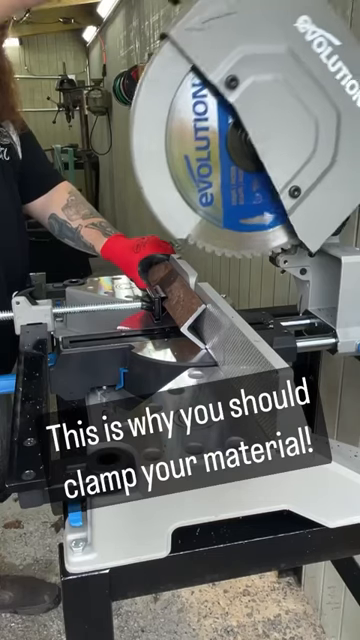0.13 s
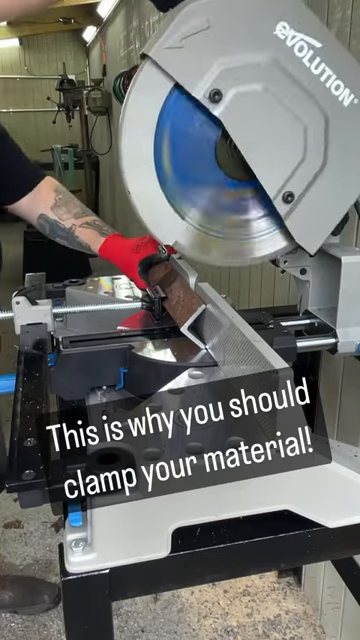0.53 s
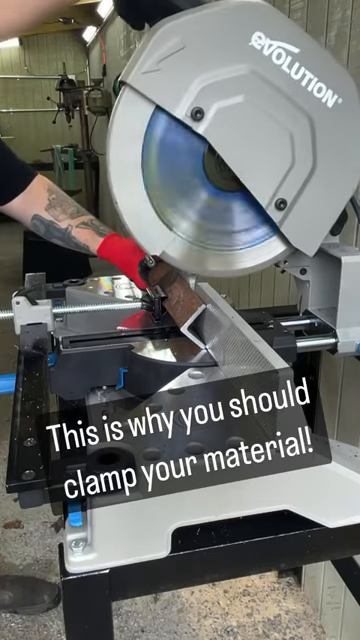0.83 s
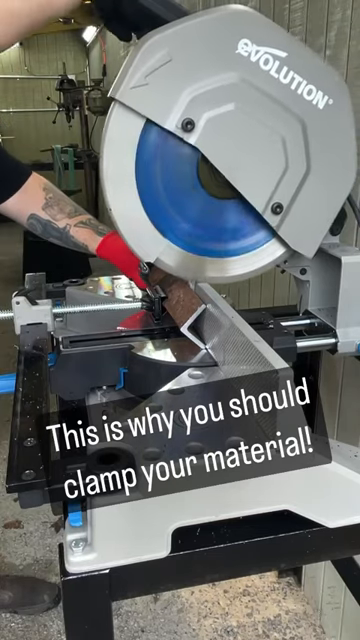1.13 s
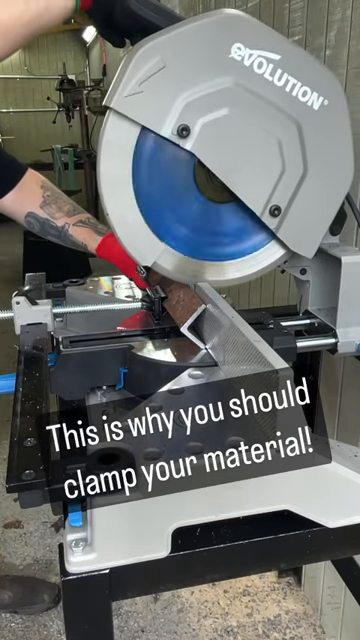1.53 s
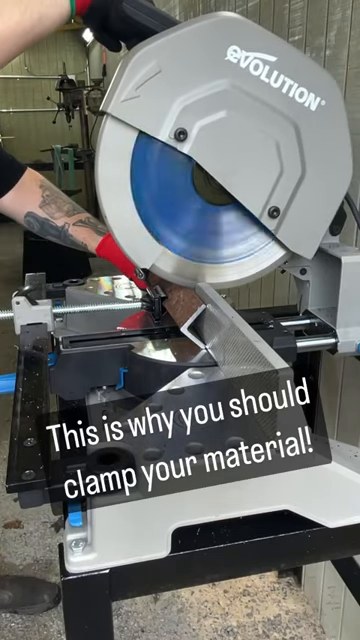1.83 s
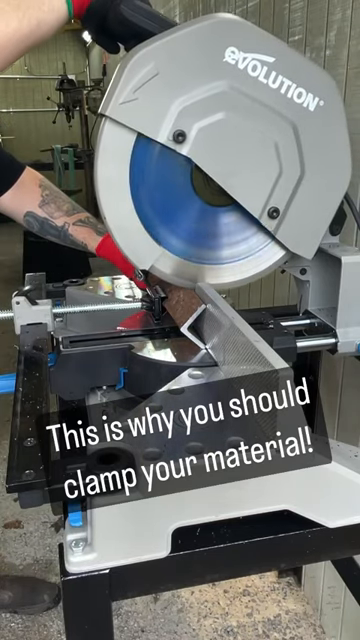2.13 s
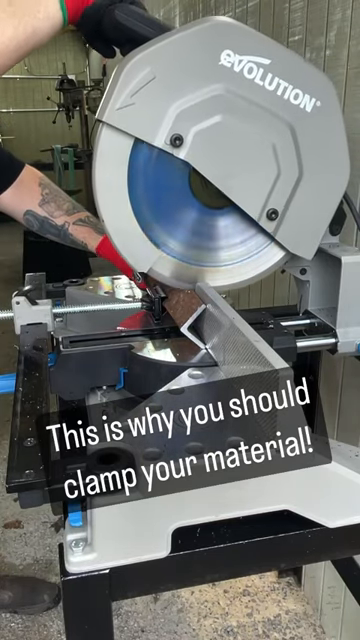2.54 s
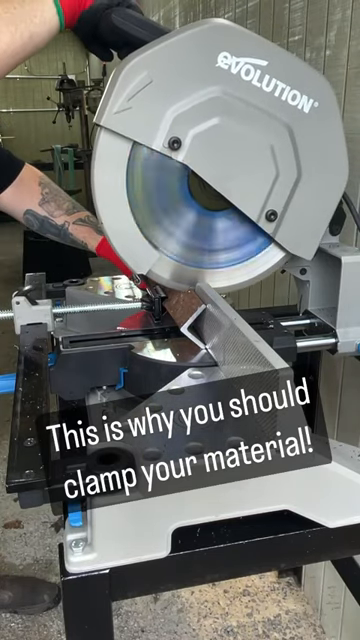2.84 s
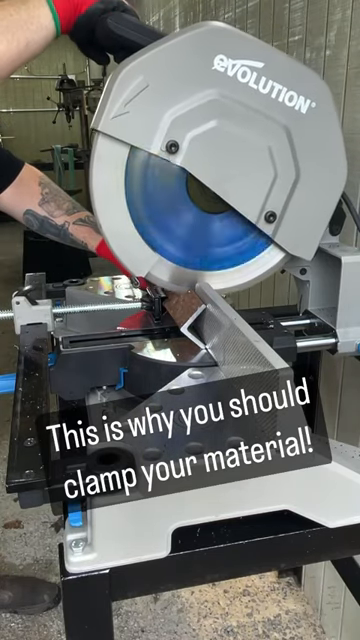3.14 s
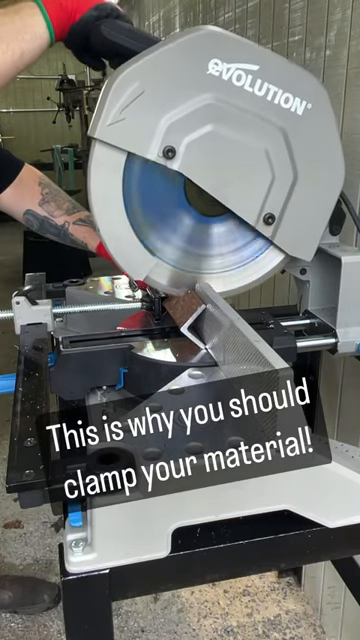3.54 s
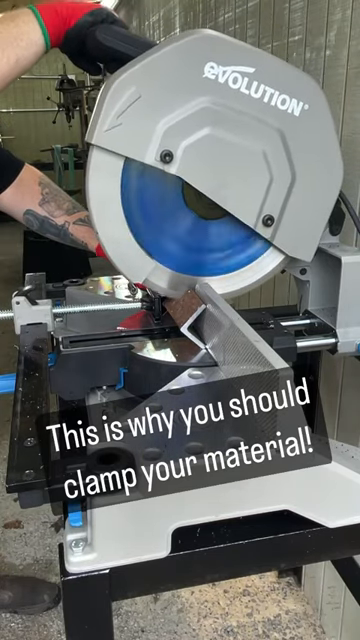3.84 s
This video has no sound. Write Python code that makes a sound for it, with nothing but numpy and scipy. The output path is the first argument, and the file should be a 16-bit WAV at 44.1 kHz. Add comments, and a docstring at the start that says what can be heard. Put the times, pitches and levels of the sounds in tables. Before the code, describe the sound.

A chop saw in a quiet workshop, close up in stereo: faint rustles, a trigger clack, motor hum and whine climbing to a roar, then the blade bites steel with shrieking, ringing grinding until the end.

```python
"""A chop saw grinds steel in a workshop, close to a phone with two microphone ports: tooth-rate tones shriek,
flickering noise grinds, and blade and workpiece ring as resonators driven by that grinding.
Under it the motor hums, whines in multiples of its rotor speed and roars with cooling air; it slowly sags.
Rustles and a trigger clack come first; puffs of air thump the phone as sines that drop in pitch.
A quiet shop lies beneath; the two ports hear it all with their own lead, balance and echoes."""
import sys
import numpy as np
from scipy import signal
from scipy.fft import rfft, irfft
from scipy.io import wavfile
from scipy.ndimage import uniform_filter1d

SR = 44100
rng = np.random.default_rng(int(sys.argv[2]) if len(sys.argv) > 2 else 0)


def unload_audio(sound):
    """Save the sound as a 16-bit wav file, at the path given as the first command line argument."""
    columns = np.transpose(np.atleast_2d(sound))
    # keep every value between -1 and 1, then stretch to whole-number steps
    steps = np.round(np.clip(columns, -1, 1) * 32767)
    wavfile.write(sys.argv[1], SR, steps.astype(np.int16))


N = 176400
T = np.arange(N) / SR
F = np.arange(N // 2 + 1) * SR / N + 1e-9  # just above zero, so its logarithm exists


def undb(db):
    """Decibels to gain."""
    return 10 ** (np.asarray(db) / 20)


def curve(table, col=1, at=T):
    """One column of a table, joined by straight lines."""
    return np.interp(at, np.array(table)[:, 0], np.array(table)[:, col])


def unit(x):
    """Scale to rms 1."""
    return x / np.std(x)


def walk(rate):
    """Random drift: levels held 1 / rate seconds and slewed twice; spread near 1."""
    hold = int(SR / rate)
    steps = np.repeat(rng.standard_normal(N // hold + 1), hold)
    return 1.194 * uniform_filter1d(uniform_filter1d(steps, hold), hold)[:N]


def after(start, decay):
    """Sudden start, then an exponential fade to 1/e in decay seconds."""
    return (T >= start) * np.exp(-np.clip(T - start, 0, None) / decay)


def tone(turns, db):
    """A sine of rms level db at a random starting phase."""
    return np.sqrt(2) * undb(db) * np.sin(2 * np.pi * (turns + rng.random()))


def ring(x, hz, t60):
    """One decaying mode, a two-pole resonator, rung by x."""
    pole = np.exp(2j * np.pi * hz / SR - np.log(1000) / (t60 * SR))
    return signal.lfilter([1], [1, -pole], x).imag


def hiss(table, flicker_db, lift_db=0, colour=1):
    """Coloured noise in half-octave bands that flicker alone; lift_db tilts the treble."""
    shape_db = np.interp(np.log(F), np.log(np.array(table)[:, 0]), np.array(table)[:, 1])
    spec = rfft(rng.standard_normal(N)) * colour * undb(shape_db)
    spec = spec / np.std(irfft(spec, N))
    band_place = np.clip(2 * np.log2(F / 40), 0, 18)  # half octaves above 40 Hz
    out = 0
    for step in range(19):
        share = np.clip(1 - abs(band_place - step), 0, 1)
        tilt = np.clip((step - 8.) / 4.8, 0, 1)  # none at 640 Hz, full from about 3.4 kHz
        out = out + irfft(spec * share, N) * undb(flicker_db * walk(18) + tilt * lift_db)
    return out


# countless small resonances of guard, blade and bench
MESH_HZ, MESH_WHINE_DB, MESH_ROAR_DB, MESH_GRIND_DB = 60, 1.5, 2.5, 4.5


def mesh():
    """Small resonances as a random comb over frequency, spread near 1."""
    spots = np.arange(0, SR / 2 + MESH_HZ, MESH_HZ / 2)
    heights = rng.standard_normal(len(spots))
    return lambda hz: np.interp(hz, spots, heights)


# Colour of the quiet shop: (frequency [Hz], relative level [dB per Hz])
SHOP_COLOUR = [(30, -8), (70, 7.5), (200, -9), (400, -9), (800, -13), (1500, -14.5), (3000, -25),
               (6000, -27), (10000, -16), (12000, -34), (14000, -60)]


def shop():
    """The quiet room: faint coloured noise whose bands flicker."""
    return undb(-65) * hiss(SHOP_COLOUR, 4.4)


def crisp_noise():
    """Bright crackle: differenced noise through a broad resonance, cut above 11 kHz."""
    crisp = unit(signal.lfilter([1, -1], [1, -1.7, .74], rng.standard_normal(N)))
    return signal.sosfilt(signal.butter(4, 11000, fs=SR, output="sos"), crisp)


def dull_noise():
    """Boxy knock: noise through a heavily damped 770 Hz mode."""
    return unit(ring(rng.standard_normal(N), 770, 0.005))


# Small rustles before the start: (time [s], level before the two noises mix [dB], decay [s])
RUSTLE_HITS = [(.037, -55, .035), (.075, -63, .03), (.2, -68, .012), (.215, -68, .01), (.262, -67, .012),
               (.287, -56, .018)]


def rustles():
    """Sudden rustles that fade, a blend of crackle and knock."""
    level = sum(undb(db) * after(time, decay) for time, db, decay in RUSTLE_HITS)
    return level * (0.6 * crisp_noise() + 1.36 * dull_noise())


PRESS_S, PRESS_DB, PRESS_DECAY_S = .416, -43, 0.058
TRIGGER_S, TRIGGER_DB, TRIGGER_DECAY_S = .425, -26.5, 0.022
PING_HZ, PING_DB, PING_T60_S = 5580, -28.5, 0.04


def trigger():
    """A crisp press, a dull clack and a high ping, each dying away exponentially."""
    press = undb(PRESS_DB) * after(PRESS_S, PRESS_DECAY_S) * crisp_noise()
    clack = undb(TRIGGER_DB) * after(TRIGGER_S, TRIGGER_DECAY_S) * dull_noise()
    ping = tone(PING_HZ * T, PING_DB) * after(TRIGGER_S - .003, PING_T60_S / np.log(1000))
    return press + clack + ping


# Low rumble while the saw runs: (time [s], level [dB])
RUMBLE_LEVEL = [(0.45, -69), (0.6, -57), (2.0, -68), (2.22, -53), (2.73, -85), (3.28, -82), (3.64, -58),
                (4.0, -61)]


def rumble():
    """Noise rings a low 64 Hz mode while its level drifts."""
    low = unit(ring(np.diff(rng.standard_normal(N + 1)), 64, 0.092))
    return undb(curve(RUMBLE_LEVEL) + 2.5 * walk(7.9)) * low * (T > TRIGGER_S)


# Puffs of air on the ports: (time [s], level of the sine's peak before its fade [dB], start pitch [Hz])
AIR_PUFFS = [(2.15, -32, 403), (2.194, -30, 250), (2.2126, -20, 610)]
PUFF_END_HZ, PUFF_SAG_S, PUFF_FADE_S = 9.7, 0.0021, 0.028


def puffs():
    """Each puff is a low thump: a sine sagging towards a very low pitch under a bell-shaped fade."""
    out = 0
    for time, db, hz in AIR_PUFFS:
        age = np.clip(T - time, 0, None)
        sag = (hz - PUFF_END_HZ) * PUFF_SAG_S * np.log(1 + age / PUFF_SAG_S)
        turns = PUFF_END_HZ * age + sag
        swell = np.clip(age / 0.0018, 0, 1) * np.exp(-(age / PUFF_FADE_S) ** 2)
        out = out + undb(db) * swell * np.sin(2 * np.pi * turns)
    return out


# Rotor run-up and sag: (time [s], speed [turns per s])
ROTOR_SPEED = [(.42, 59), (.52, 112), (.6, 146), (.7, 188), (.8, 221), (.9, 247), (1.1, 284), (1.25, 302),
               (1.5, 327), (1.75, 344), (1.95, 352), (2.15, 352), (2.5, 341), (2.75, 337.2), (3.75, 317),
               (4, 316)]


def rotor():
    """Turns made by the rotor: its speed summed over time."""
    return np.cumsum(curve(ROTOR_SPEED)) / SR


# Resonances of the motor housing: (frequency [Hz], width [Hz], lift [dB])
HOUSING_MODES = [(322.8, 22, 7.5), (576.5, 78, 7.5), (699, 110, 5), (850, 124, 4.5), (1242, 135, 5),
                 (2140, 630, 2.5), (3680, 1400, 6.5), (5770, 150, 3)]


def housing(hz):
    """Gain of the housing, which lifts sound near each of its resonances."""
    return undb(sum(db / (1 + (2 * (hz - f) / width) ** 2) for f, width, db in HOUSING_MODES))


# Mains hum of the straining motor: (time [s], level [dB])
HUM_LEVEL = [(0.42, -81), (0.448, -44), (0.486, -41), (0.518, -35.5), (0.552, -43.5), (0.73, -51),
             (0.94, -60), (1.2, -62)]
HUM_HZ, HUM_OVERTONE_DB = 117.5, -7


def hum():
    """Mains hum at a fixed pitch and its octave."""
    return tone(HUM_HZ * T, curve(HUM_LEVEL)) + tone(2 * HUM_HZ * T, curve(HUM_LEVEL) + HUM_OVERTONE_DB)


FLICKER_DB = 2.  # spread of each noise band, for roar and grinding
# Motor mix: (time [s], roar level [dB], roar treble lift [dB], whine level before orders and housing [dB])
MOTOR_LEVEL = [(.42, -28.5, -8.5, -35), (.52, -29.5, -15.5, -47), (.6, -26.5, -9.5, -38),
               (.69, -28, -5.5, -42), (.8, -25, -7, -38), (.91, -25.5, -3.5, -40), (1.1, -27.5, 1, -38.5),
               (1.3, -23, -1, -38.5), (1.51, -23.5, -0.5, -29.5), (1.75, -22.5, 1.5, -32),
               (1.95, -24, 4.5, -32), (2.18, -32.5, 3, -49), (2.3, -32.5, 0.5, -57),
               (2.58, -36.5, 5, -46.5), (3.03, -33.5, 4, -43), (3.5, -31, -4, -42),
               (3.8, -31.5, -1.5, -43.5), (4, -36, 1, -49)]
# Colour of the cooling air before the housing: (frequency [Hz], relative level [dB per Hz])
ROAR_COLOUR = [(50, -62), (150, -27), (250, -14), (500, -7), (800, -4.5), (1600, -5), (3000, -10.5),
               (4700, -12), (7000, -11.5), (10000, -6), (11500, -15.5), (13000, -35), (15000, -70)]


def roar(comb):
    """Cooling air: flickering noise coloured by the housing and the small resonances."""
    colour = housing(F) * undb(MESH_ROAR_DB * comb(F))
    return undb(curve(MOTOR_LEVEL)) * hiss(ROAR_COLOUR, FLICKER_DB, curve(MOTOR_LEVEL, col=2), colour)


# Whine partials: (multiple of rotor speed [1], level to the whine [dB], wavering [dB],
# clear from [s], clear until [s])
ORDERS = [(1, -11, 5.5, 0.83, 2.05), (1, -13, 2.5, 2.4, 9), (2, -10, 8.5, 1.087, 2.3),
          (6.9, -2.5, 6, 0.74, 1.1), (6.9, 3, 1.5, 0.566, 0.661), (11.3, 2, 2, 1.73, 1.96),
          (12, -3, 3.5, 0.56, 9)]
BURIED_DB, EMERGE_S, ROUGH_DB = -18, .04, 3.5


def whine(turns, comb):
    """Rough tones locked to the rotor, lifted as they sweep through the housing resonances."""
    speed, out = curve(ROTOR_SPEED), 0
    for k, db, waver, start, end in ORDERS:
        buried = 1 - np.clip(np.minimum(T - start, end - T) / EMERGE_S + .5, 0, 1)
        level = curve(MOTOR_LEVEL, col=3) + db + waver * walk(11.98) + BURIED_DB * buried
        if k > 2:  # the higher partials are rough; a third of their pitch steps through the comb
            level = level + ROUGH_DB * walk(70) + MESH_WHINE_DB * comb(k * speed / 3)
        out = out + housing(k * speed) * tone(k * turns, level)
    return out


def motor(turns):
    """Air roar, rotor whine and mains hum, switched on by the trigger."""
    comb = mesh()
    return np.clip((T - TRIGGER_S) / 0.002, 0, 1) * (roar(comb) + whine(turns, comb) + hum())


# Clear squeals of one mode: (start [s], loudest [s], end [s], pitch [Hz], level at loudest [dB])
MODE_SQUEALS = [(1.76, 1.815, 1.87, 3270, -19.5), (1.79, 1.83, 1.86, 5240, -20),
                (2.1, 2.2, 2.29, 2741, -27.5), (2.5, 2.84, 2.98, 2461, -30.5), (2.42, 2.65, 3.1, 2064, -36)]


def squeals():
    """Each squeal is a wavering sine that grows, peaks and dies."""
    out = 0
    for start, top, end, hz, db in MODE_SQUEALS:
        swell = np.interp(T, [start - .02, start, top, end, end + .02], [-120, -14, 0, -14, -120])
        out = out + tone(hz * T, db + swell + walk(30))
    return out


# The cut: (time [s], grinding level [dB], tooth tone level [dB], overtone lift [dB])
CUT_LEVEL = [(1.74, -50, -65.5, 0), (1.8, -25.5, -41, -4), (1.82, -26, -27, -3), (1.86, -22.5, -42, -8),
             (1.9, -20.5, -39.5, 9), (1.96, -27, -32.5, 3), (2.04, -17.5, -27, 1.5), (2.1, -20, -37, 0.5),
             (2.15, -14, -33, 2), (2.21, -20, -52, -9), (2.26, -29.5, -53, -7), (2.4, -30, -37.5, -17),
             (2.6, -26.5, -33, -22), (2.7, -32.5, -33, -23), (2.85, -27.5, -35, -14),
             (3.05, -25.5, -36.5, -22.5), (3.2, -28.5, -33, -20), (3.43, -22.5, -37, -12),
             (3.55, -30.5, -35.5, -13), (3.75, -24, -38, -12), (4, -31.5, -35, -14)]
# Overtones of the teeth: (multiple of tooth rate [1], level to the tooth tone before overtone lift [dB])
TOOTH_OVERTONES = [(1, -0.5), (2, 0.5), (3, -9), (4, -13.5), (5, -3.5), (6, -3), (8, -3), (9, -18)]
# Throb of the tooth tone as the blade wobbles: (time [s], rate [Hz])
WOBBLE_RATE = [(3.3, 55), (3.45, 48), (4, 44)]
WOBBLE_FROM_S, WOBBLE_BELOW_DB, WOBBLE_ABOVE_DB = 2.43, -5, -12  # side tone levels at full growth


def tooth_song(teeth):
    """Tooth passes sing as harmonics; blade wobble adds side tones a throb below and above."""
    level, song = curve(CUT_LEVEL, col=2), 0
    for k, db in TOOTH_OVERTONES:
        lift = (k > 1) * (curve(CUT_LEVEL, col=3) + 2.0 * walk(16))
        song = song + tone(k * teeth, level + db + lift + walk(9.54))
    throb = np.cumsum(curve(WOBBLE_RATE)) / SR
    grown = np.clip((T - WOBBLE_FROM_S) / 1.0, .4, 1)
    below = tone(teeth - throb, level + WOBBLE_BELOW_DB + 3 * walk(20))
    above = tone(teeth + throb, level + WOBBLE_ABOVE_DB + 1.6 * walk(11))
    return song + grown * (below + above)


# Modes of blade and workpiece: (frequency [Hz], level before ring level and swells [dB], t60 [s],
# swells as (time [s], half length [s], lift [dB]))
BLADE_MODES = [(467.4, -23, 0.27, [(3.85, 0.43, 12)]), (595, -12.5, 0.15, [(2.7, 0.41, 4)]),
               (721, -13.5, 0.44, [(2.28, 0.048, 11), (3.75, 0.19, 13.5)]),
               (974, -17.5, 0.31, [(2.6, 0.21, 11.5)]), (1640, -10, 0.45, [(2.35, 0.13, 2),
               (3.6, 0.21, 5)]), (2066, -10.5, 0.81, [(2.25, 0.1, 6.5)]),
               (2470, -9, 0.29, [(2.43, 0.12, 11)]), (2741, -16, 0.31, [(3.4, 0.076, 4.5)]),
               (3320, -12, 0.18, [(2.25, 0.075, 6)]), (3353, -7.5, 0.036, [(2.14, 0.035, 6.5),
               (3.15, 0.3, 5)]), (4136, -11.5, 0.33, [(3.92, 0.077, 16)]),
               (4650, -8, 0.09, [(3.4, 0.29, 3)]), (5360, -9.5, 0.12, [(2.2, 0.096, 8.5)]),
               (5480, -8.5, 0.09, [(2.5, 0.13, 6), (3.2, 0.24, -3)]),
               (6000, -16.5, 0.24, [(3.2, 0.22, -1)]), (6795, -9.5, 0.093, [(2.2, 0.05, 4),
               (3.4, 0.83, 7)]), (7500, -5, 0.084, [(2.1, 0.032, 9)]), (9500, -6, .2, []),
               (9920, -5, 0.23, []), (10620, -3.5, 0.054, [(2.05, 0.11, -4), (3.4, 0.4, 1.5)]),
               (11040, -6.5, 0.21, [])]
RING_DB, RING_WAVER_DB, BURST_DB = -9.5, 1.65, 3
SQUEAL = .02  # rms of the steady sine pushing each mode, against noise of rms 1


def blade_ring(force):
    """The cutting force rings the modes with noise and a steady sine, now one mode, now another."""
    out = 0
    for hz, db, t60, swells in BLADE_MODES:
        push = rng.standard_normal(N) + SQUEAL * tone(hz * T, 0)
        level = db + RING_WAVER_DB * walk(5.21)
        level = level + (t60 < .05) * BURST_DB * walk(45)  # only the shortest rings burst
        level = level + sum(lift * np.exp(-((T - s) / half) ** 2) for s, half, lift in swells)
        out = out + ring(push * force * undb(level), hz, t60) / np.std(ring(push, hz, t60))
    return undb(RING_DB) * out


# Colour of the grinding before the small resonances: (frequency [Hz], relative level [dB per Hz])
GRIND_COLOUR = [(60, -51), (250, -41), (500, -13.5), (1200, -11), (2500, -11), (4700, -6.5), (7000, -4.5),
                (10000, 4), (11500, -4.5), (13000, -18.5), (15000, -51)]
TOUCH_S, CHATTER_DB = 1.72, 1.33
TEETH_PER_ROTOR_TURN, TEETH, TURN_DB = 3.767, 66, 1.5


def cut(turns):
    """Teeth sing at their rate and grind the steel; the grinding force rings blade and workpiece."""
    teeth = TEETH_PER_ROTOR_TURN * turns
    touch = np.clip((T - TOUCH_S) / 0.029, 0, 1)
    chatter = CHATTER_DB * (walk(70) + walk(20))
    once_a_turn = TURN_DB * np.sin(2 * np.pi * teeth / TEETH)
    force = touch * undb(curve(CUT_LEVEL) + chatter + once_a_turn)
    grind = force * hiss(GRIND_COLOUR, FLICKER_DB, colour=undb(MESH_GRIND_DB * mesh()(F)))
    return touch * tooth_song(teeth) + squeals() + grind + blade_ring(force)


# The two ports: (frequency [Hz], left leads by [radians], left over right [dB], unrelated echo to direct [dB])
PORT_RESPONSE = [(100, 0, 0, -30), (300, 0, -.7, -14), (690, -.55, -3.3, -6), (1200, -.5, -2.6, -6),
                 (1550, 0, -1, -8), (2150, .25, -.6, -9), (3300, .66, -1, -7), (4300, 1.55, -2, -4),
                 (4850, 3.14, -2.8, -3), (5350, 5.4, -1, -8), (5650, 5.9, -.5, -10), (6300, 6.55, 0, -9),
                 (7400, 7.9, 0, -8), (8300, 8.9, 0, -10), (8500, 9.425, 0, -50), (9500, 9.425, 0, -50),
                 (9700, 9.9, 0, -10), (11000, 11.2, 0, -7), (11700, 12, 0, -8), (11900, 12.566, 0, -50),
                 (20000, 12.566, 0, -50)]
ECHO_T60_S = 0.88


def ports(dry):
    """Two ports hear a lead and balance that change with pitch; decaying noise echoes differ per side."""
    lead, balance = curve(PORT_RESPONSE, at=F), curve(PORT_RESPONSE, col=2, at=F)
    wet = undb(curve(PORT_RESPONSE, col=3, at=F))
    tails = rng.standard_normal((2, N)) * after(0.00374, ECHO_T60_S / np.log(1000))
    tails = rfft(tails / np.sqrt(np.sum(tails ** 2, axis=1, keepdims=True)))
    side = np.array([[.5], [-.5]])  # left, right
    heard = (1 + wet * tails) / np.sqrt(1 + wet ** 2)
    heard = heard * np.exp(1j * side * lead) * undb(side * balance)
    size = 2 * N
    # delay the response so its early part survives, then trim that delay off
    heard = rfft(np.roll(irfft(heard, N), N // 4, axis=1), size)
    return irfft(rfft(dry, size) * heard, size)[:, N // 4:N // 4 + N]


def scene():
    """Shop, trigger, air, motor and cut reach the two ports; silence before 0.037 s."""
    turns = rotor()
    dry = shop() + rustles() + trigger() + rumble() + puffs() + motor(turns) + cut(turns)
    return ports(dry) * (T > .037)


def record(dry):
    """The phone rounds the loudest peaks, dulls the highest treble and cuts the top."""
    soft = signal.sosfilt(signal.butter(8, 12900, fs=SR, output="sos"), np.tanh(dry))
    return signal.sosfilt(signal.ellip(8, .2, 70, 15200, fs=SR, output="sos"), soft)


dry = scene()
out = record(dry)
unload_audio(out)
```